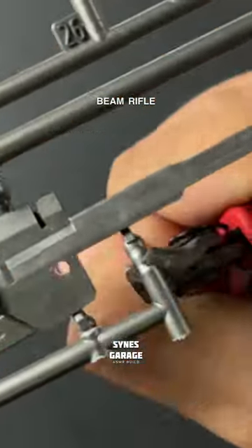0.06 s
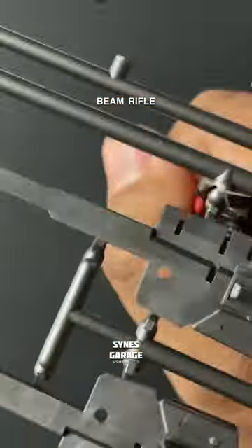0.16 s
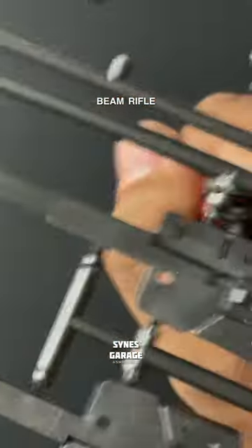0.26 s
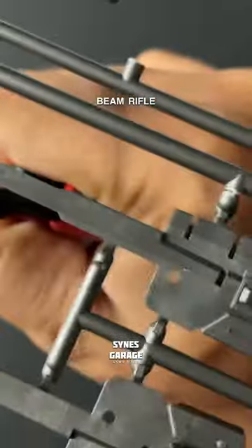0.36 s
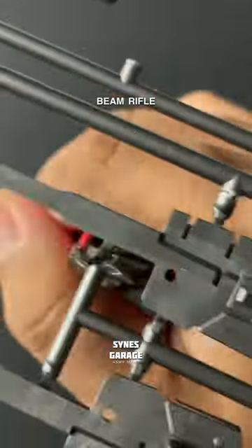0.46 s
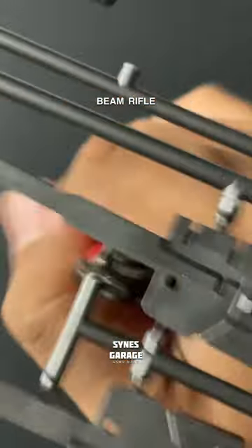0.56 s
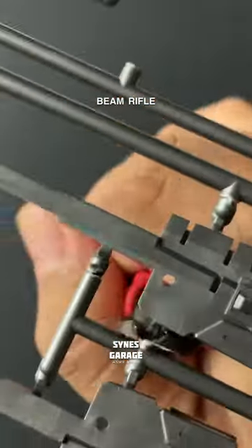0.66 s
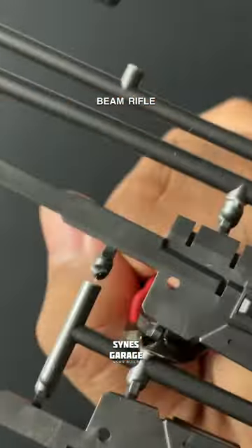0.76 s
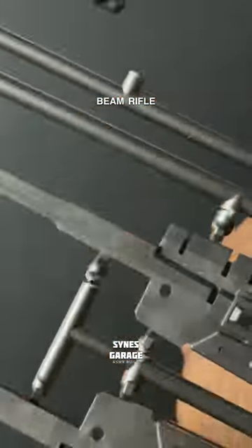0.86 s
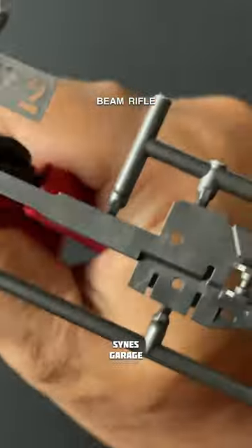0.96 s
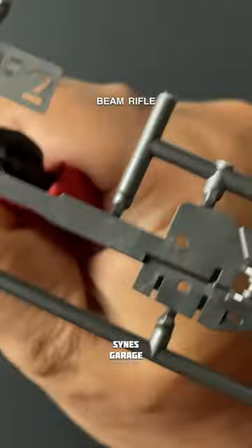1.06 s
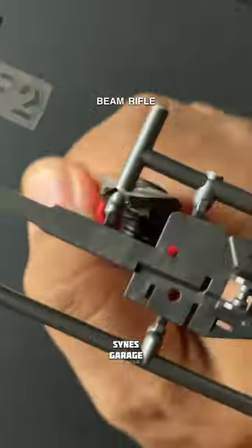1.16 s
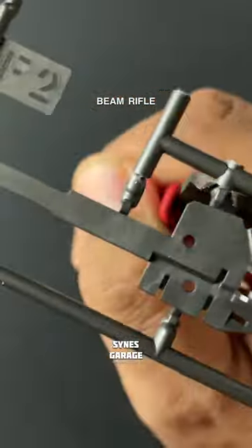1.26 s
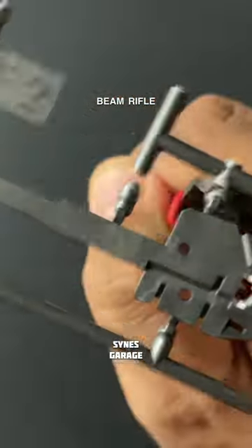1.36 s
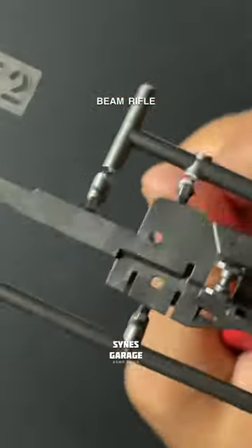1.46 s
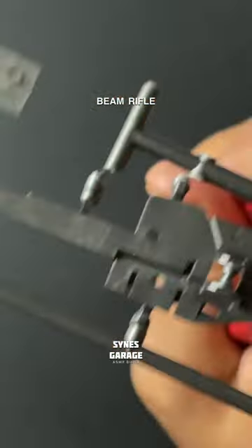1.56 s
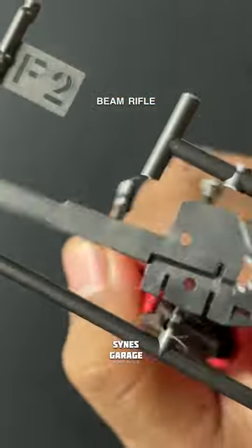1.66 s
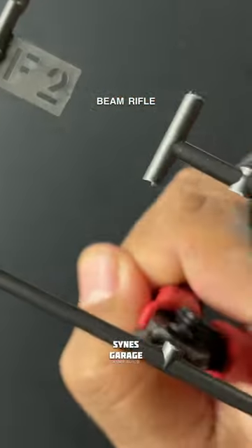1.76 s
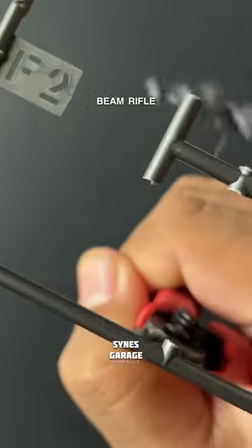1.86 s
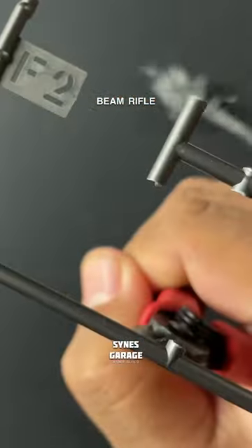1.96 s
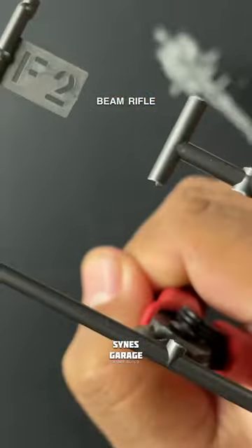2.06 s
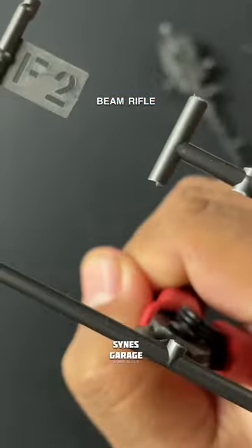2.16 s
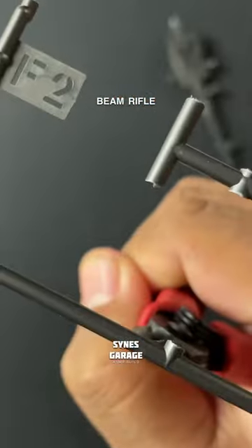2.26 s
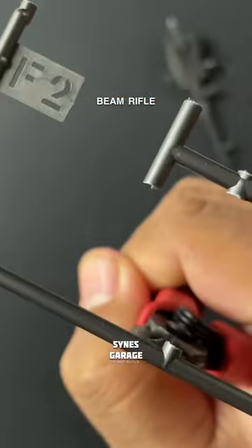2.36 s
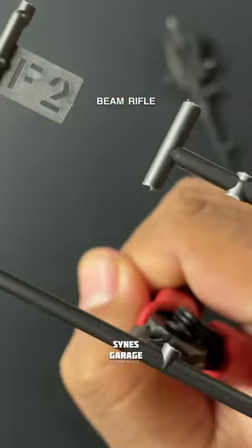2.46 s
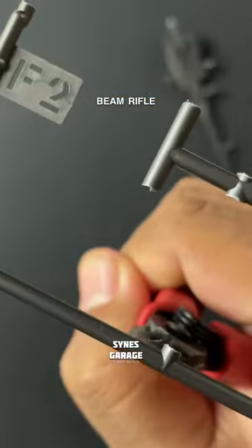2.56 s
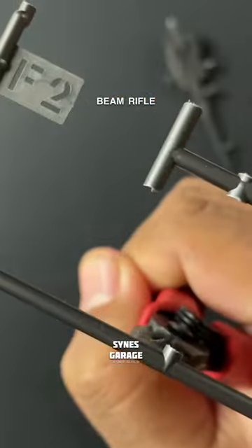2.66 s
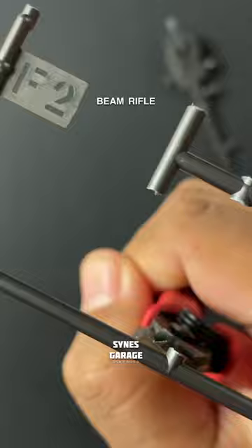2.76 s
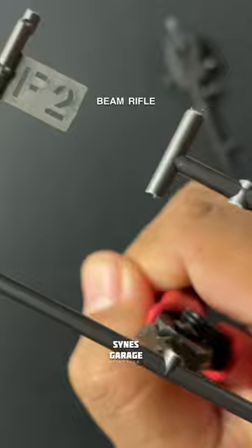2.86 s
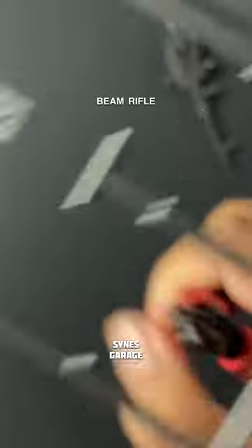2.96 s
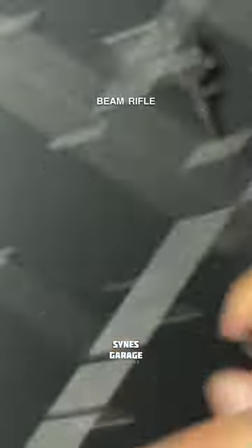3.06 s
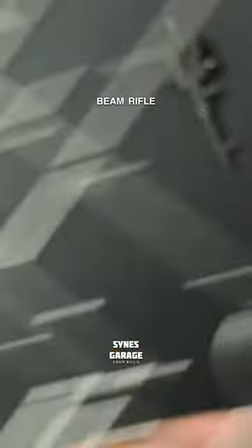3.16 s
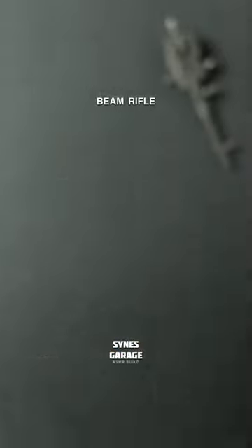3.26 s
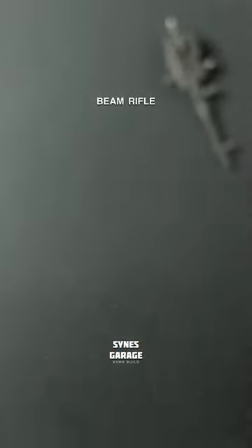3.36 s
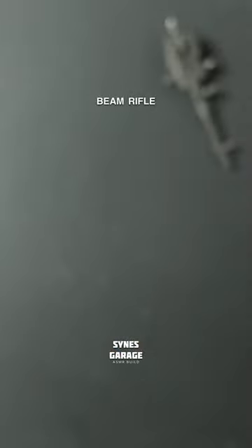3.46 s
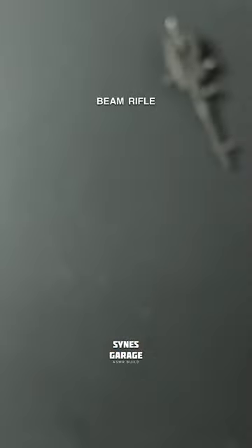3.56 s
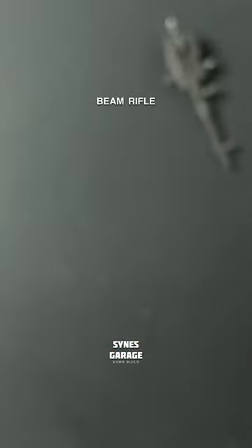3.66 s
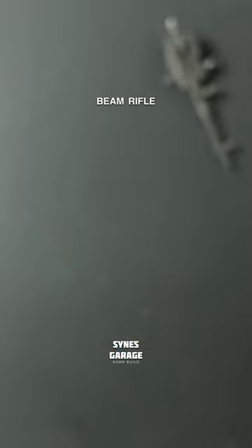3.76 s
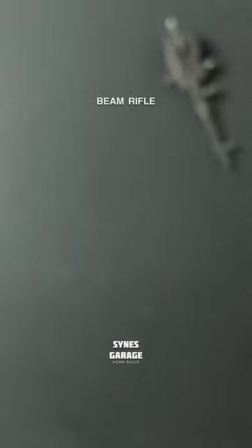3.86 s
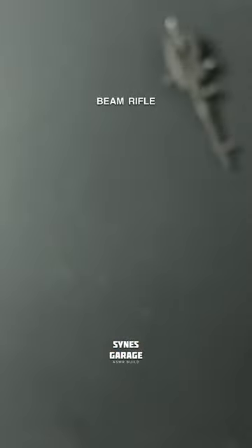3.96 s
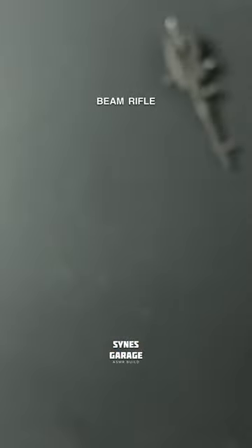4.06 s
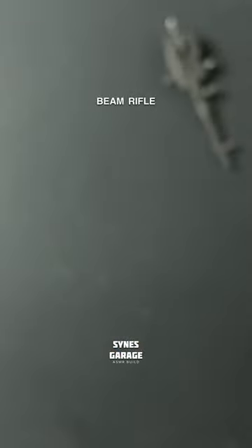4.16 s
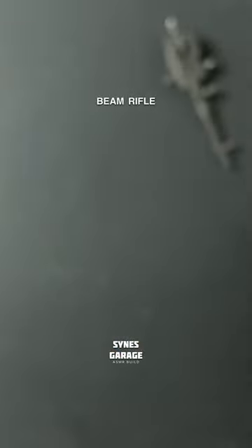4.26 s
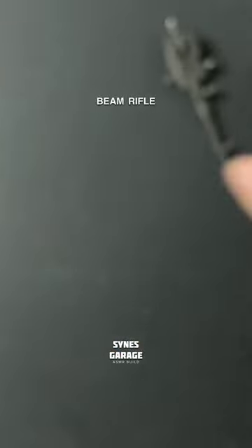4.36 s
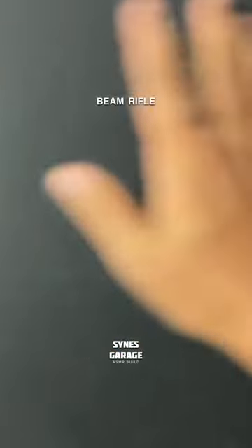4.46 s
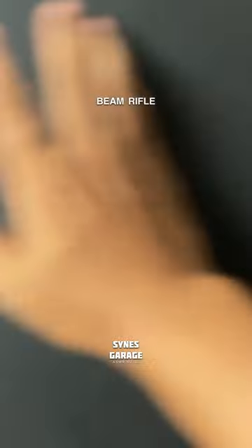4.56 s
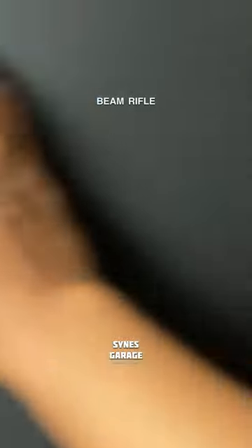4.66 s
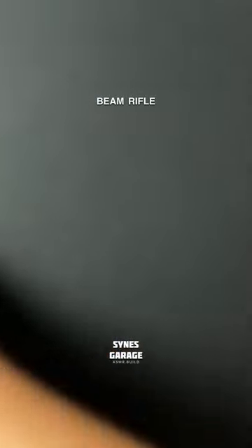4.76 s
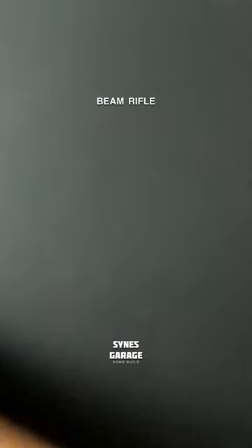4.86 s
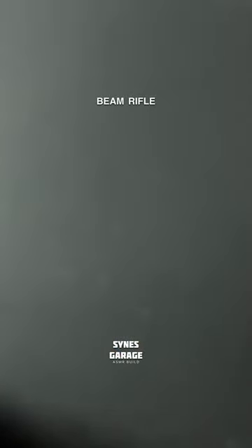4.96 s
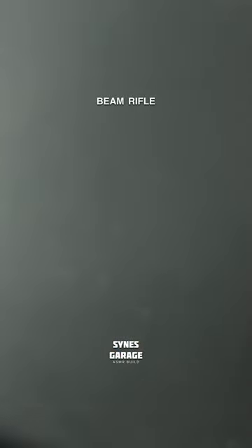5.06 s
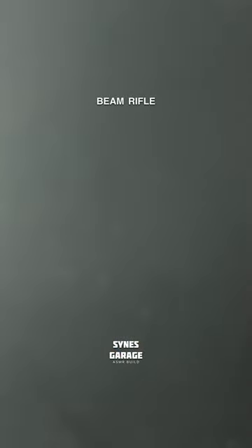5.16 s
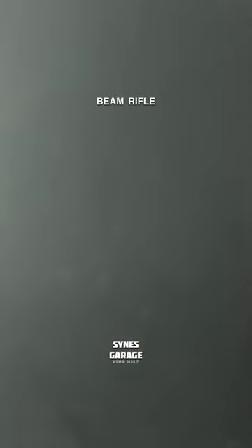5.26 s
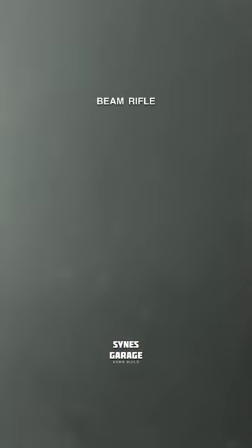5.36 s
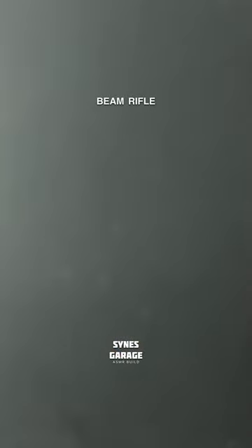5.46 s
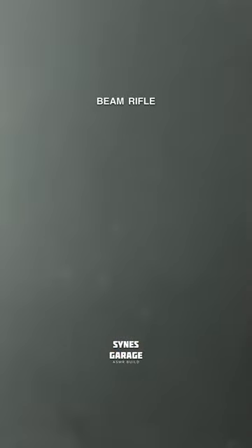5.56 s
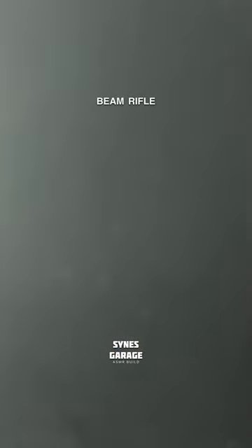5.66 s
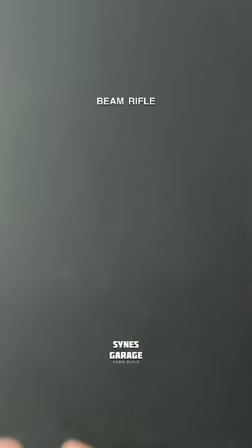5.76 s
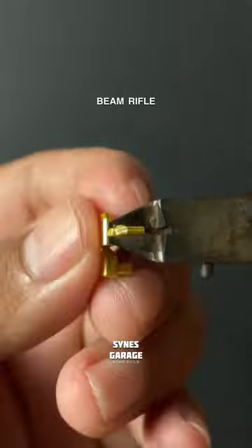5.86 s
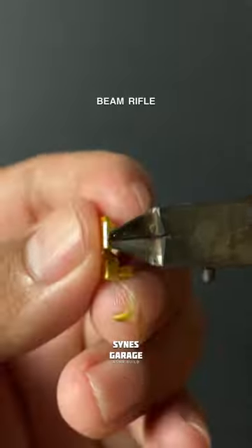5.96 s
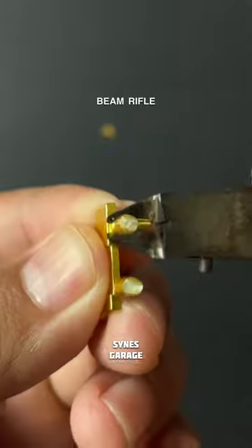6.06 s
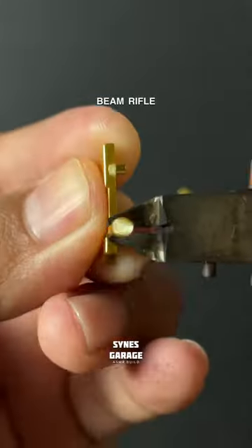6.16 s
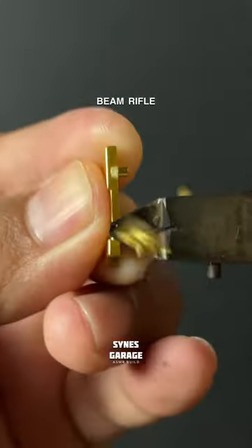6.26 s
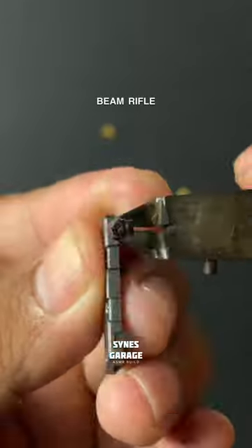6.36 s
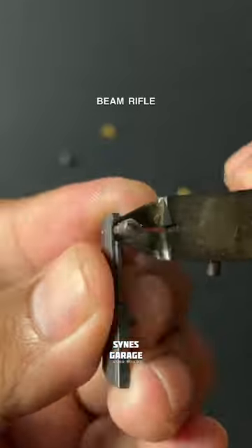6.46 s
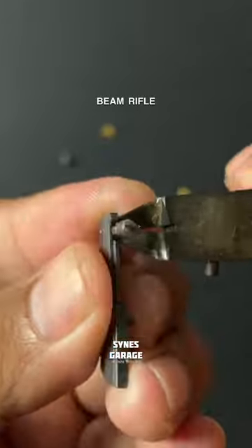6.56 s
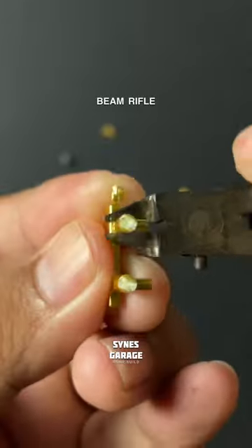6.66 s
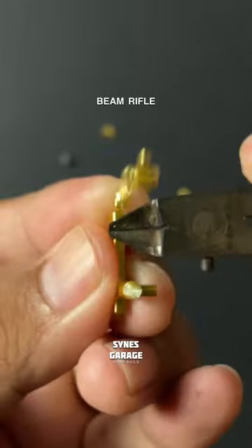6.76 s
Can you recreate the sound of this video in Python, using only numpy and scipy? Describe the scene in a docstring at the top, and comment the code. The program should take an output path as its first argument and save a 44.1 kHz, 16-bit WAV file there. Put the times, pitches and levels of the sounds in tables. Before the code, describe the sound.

Hobby nippers snip a plastic frame in quick abrupt cuts, a part bounces, the frame is set down, a palm sweeps, nubs are trimmed.

```python
"""A fast run of snips, the first already ringing: hobby nippers on a plastic runner, close to a pair of mic ports.
Each snip is a crack that spreads through the plastic as a falling chirp, and a ring that a jump cut ends.
The nippers spring open, a cut part clinks and bounces on the table, and the runner is put down with dull knocks.
A hand wipes over the top, heard as filtered noise in strokes; then six small nubs are trimmed in close-up.
Under it all lie a low rumble and faint air, both shaped noise, at one level for each of three scenes."""
import sys
import numpy as np
from scipy import signal
from scipy.fft import rfft, irfft, next_fast_len
from scipy.io import wavfile
from scipy.ndimage import uniform_filter1d, map_coordinates

SR = 44100
rng = np.random.default_rng(int(sys.argv[2]) if len(sys.argv) > 2 else 0)


def transcribe(u):
    """Save the signal u as a 16-bit wav file named by the first command-line argument.

    u: samples, shape (n,) or (channels, n), limited to [-1, 1]; the rate is SR.
    q: integer samples, one column per channel.
    """
    v = np.clip(np.atleast_2d(u).T, -1, 1)
    q = np.round(v * 32767).astype(np.int16)
    wavfile.write(sys.argv[1], SR, q)


N = 299880

# Room noise in the three scenes: fast cuts, table, close-up. Each row: start in seconds, rumble in dB, air in dB.
ROOM = [(0, -61, -68.5), (1.75, -49, -62), (5.865, -62, -69.5)]
# Colour of the low rumble and of the faint air. Each row: frequency in Hz, relative level in dB.
RUMBLE = [(20, -39), (42, -11.5), (60, -4.5), (68, 2.5), (80, -10.5), (110, -9.5), (165, -20.5),
          (800, -66.5)]
AIR = [(60, -14.5), (200, 6.5), (600, -2), (2000, -7.5), (5000, -14.5), (9000, -31)]

# Things sliding over the table. Each row: start in seconds, length in seconds, rub in dB,
# hiss over rub in dB before its mid-stroke swell, hiss roll-off in Hz.
STROKES = [(2.244, 0.39, -61, -23.5, 5020), (2.903, 0.42, -70, -12, 14000), (3.475, 0.054, -41, 1, 8050),
           (4.333, 0.24, -61, 2.5, 11000), (4.509, 1.072, -44, -5.5, 16600), (5.607, 0.36, -57, -21, 7940)]
# Colour of the friction on the matt top. Each row: frequency in Hz, relative level in dB.
RUB = [(200, 5), (1000, 2.5), (2000, -0.5), (5000, -13), (7000, -14.5), (12500, -11), (16000, -21)]
# Resonances of the table top under the hand. Each row: frequency in Hz, lift in dB before any scaling.
TOP_MODES = [(495, 11.5), (737, 10), (1008, 8)]

# Light taps on the table: first the cut part bouncing, then under the hand. Each row: time in seconds,
# clatter in dB, hardness as crack over clatter in dB, bright tick in dB.
DROPS = [(1.959, -32, -19, -38), (1.968, -29.5, -8.5, -25), (1.9698, -54, 6, -20), (2.1413, -27, 1.5, -42),
         (4.505, -42.5, -1, -53), (5.199, -33.5, -1, -44), (5.3159, -36, -4.5, -33.5)]
# Colour of the clatter, and of the crack of a hard edge. Each row: frequency in Hz, relative level in dB.
DROP = [(50, -3), (120, 7.5), (300, -9.5), (600, -5), (1000, -8.5), (3700, -12), (6500, -23.5),
        (10000, -13.5), (16000, -32)]
TAP_CRACK = [(100, -21), (600, -11), (1500, -6.5), (3300, 2), (5500, -7), (9000, -11), (16000, -20)]
# The runner is put down and settles. Each row: time in seconds, level in dB, treble tilt in dB per octave.
KNOCKS = [(3.8422, -16, 1), (4.048, -23, -2), (4.058, -20, -1), (4.073, -27, -3), (4.104, -25, -3.5)]
# Colour of a runner knock. Each row: frequency in Hz, relative level in dB.
KNOCK = [(40, -22), (115, 3.5), (165, -7), (300, 0.5), (750, -3), (1300, -4), (2400, -16), (4000, -24),
         (11000, -46)]
# How long the table rings. Each row: frequency in Hz, time to fall 60 dB in seconds.
TABLE_T60 = [(100, 0.36), (300, 0.42), (1000, 0.35), (2500, 0.32), (10000, 0.096)]

# The nippers spring open after the last runner snip. Each row: time in seconds, level in dB.
SPRING_PINGS = [(1.7122, -14.5)]
# Modes of the spring. Each row: frequency in Hz, relative level in dB, time to fall 60 dB in seconds.
SPRING_MODES = [(8720, 2.5, 0.022), (15500, -7, .04)]
# The cut part lands on its edge and rings. Each row: time in seconds, level in dB.
CLINKS = [(1.9695, -20.5)]
# Modes of the cut part. Each row: frequency in Hz, relative level in dB, time to fall 60 dB in seconds.
CLINK_MODES = [(5390, -3, 0.07), (6900, 6, 0.057), (10890, 5.5, 0.029), (12670, -7, .088)]

# Stray ticks of jaws and plastic chips. Each row: time in seconds, level in dB.
TICKS = [(0.0573, -47.5), (0.088, -29), (0.522, -55), (1.673, -47), (1.7106, -29), (2.1465, -27),
         (2.2553, -40.5), (2.297, -37.5), (2.92, -61), (3.059, -61.5), (4.968, -46), (4.991, -35.5),
         (5.01, -36), (5.284, -41), (5.543, -37.5)]
# Colour of a tick. Each row: frequency in Hz, relative level in dB.
TICK = [(300, -6.5), (1000, -10.5), (2500, -7.5), (4000, -12), (6500, -4), (11500, -1), (15500, -6)]

# Nubs trimmed off a part held in the fingers. Each row: start in seconds, time to the jump cut in seconds,
# snap in dB, thump, crunch and treble tone in dB, ring over snap in dB, closing jaws over snap in dB.
TRIMS = [(5.9245, 0.097, -11, -1.5, -3, 2.5, -23, -29), (6.1077, 0.07, -12.5, 0.5, -5.5, 3.5, -18.5, -18),
         (6.2431, .094, -13, -3.5, -5, 3, -14.5, -5), (6.425, 0.076, -24, -7.5, -2.5, 1.5, -17.5, -18),
         (6.5812, .081, -14.5, -6.5, -11.5, 4.5, -18, -8.5), (6.7273, .3, -12, -10, -13.5, -0.5, -20, -17)]
# Snap and ring colour of the held part. Each row: frequency in Hz, relative level in dB.
PART_SNAP = [(100, -29.5), (280, -2), (550, -18), (1100, -25.5), (2200, -8), (2900, -12.5), (4200, -10.5),
             (5600, -6.5), (7500, -7.5), (10500, -1), (12500, -19), (15500, 3)]
PART_RING = [(280, -2), (600, -18), (1500, -20.5), (2100, -2.5), (3000, -10), (4500, -11), (5600, -5),
             (6800, -13), (8500, -15.5), (10500, -6), (12500, -19.5), (15500, -2.5)]
# Resonances of the nippers. Each row: frequency in Hz, lift in dB before any scaling.
NIPPER_MODES = [(2060, 9.2), (2390, 9.2), (5420, 6.4), (5850, 3), (10700, 6.1)]

# Snips on the runner. Each row: start in seconds, time to the jump cut in seconds,
# snap in dB, thump, crunch and treble tone in dB, ring over snap in dB, closing jaws over snap in dB.
SNIPS = [(-0.05, 0.073, -12, -4, 2, -7, -13.5, -17), (.0934, 0.091, -11, -2, 3.5, 0.5, -12, -14.5),
         (.2619, .078, -9.5, 1.5, 4.5, 4, -12.5, -19.5), (.4102, .089, -14.5, 1, -1.5, -7.5, -13.5, -58),
         (.5763, 0.086, -15, 6, -2, -4, -16.5, -34), (.7214, .1, -11.5, -2, -6, -9, -16.5, -22.5),
         (.8974, 0.091, -8, -2.5, -1, -10, -12.5, -20), (1.0547, .086, -19.5, -1, 0, -1.5, -11, -6.5),
         (1.2218, .077, -15, -1.5, 1.5, -1, -12.5, -17.5), (1.357, 0.1, -10.5, -7.5, -1.5, 0, -13, -13),
         (1.5316, 0.093, -20, -2, 0, -1, -12, -13.5), (1.6935, 0.53, -13, -1.5, -5, 1, -15, -16.5)]
# Snap and ring colour of the runner. Each row: frequency in Hz, relative level in dB.
RUNNER_SNAP = [(50, -29.5), (130, -14), (250, -6), (420, -1), (780, -11), (1400, -4.5), (2400, -11.5),
               (3200, -13.5), (4000, -16.5), (7000, -14.5), (9000, -12), (12500, -19.5), (15500, -16)]
RUNNER_RING = [(40, -20.5), (120, -7), (700, -7.5), (1300, -8.5), (1800, -3.5), (2400, -6.5), (3100, -15),
               (4200, -17), (6500, -18.5), (10500, -19.5), (13000, -27.5), (16000, -27)]
# Damped resonances of blade and gate, then lattice modes of the runner. Each row: frequency in Hz, lift in dB.
SNAP_MODES = [(1420, 5), (2430, 7.5), (3950, 9), (8750, 3)]
RUNNER_MODES = [(389.8, 9.1), (437, 6.1), (2700, 4.8), (2200, 6.9), (2340, 4.6)]
# How long snips, ticks and the answer to a ping ring. Each row: frequency in Hz, time to fall 60 dB in seconds.
RING_T60 = [(120, 0.24), (400, 0.33), (2300, 0.24), (5500, 0.21), (12000, 0.17)]

# Width of the sound field at the two ports. Each row: frequency in Hz, side level in dB.
SPREAD = [(100, -15), (300, -8), (600, -1.5), (2500, -3.5), (5000, -7), (10000, -29.5)]
# Level difference of the ports. Each row: frequency in Hz, left over right in dB.
BALANCE = [(350, -.6), (700, 0), (1400, 2.6), (2800, 5.8), (5500, 2.5), (9000, 0)]
# Phase difference of the ports. Each row: frequency in Hz, phase lead of the left port in radians.
TWIST = [(1000, 0), (3000, .4), (5300, .1), (6600, -.9), (8200, -3.1), (10500, -5.6), (12300, -6.5),
         (15000, -9.4)]
TOP_HZ = 16450  # the band ends here

LEAD_IN_S = 0.012  # length of the noise that swells up before each snap
JAWS_MEET_S = 0.0035  # the blades meet this long after the snap
JOLT_S = 0.022  # each snip jolts the hands: time to the peak of the low thud
TAP_BASS_DB, BASS_PER_HARDNESS = -9, 0.92  # softer taps carry more bass: base level, dB lost per dB of hardness
STROKE_ATTACK_S, STROKE_RELEASE_DB_PER_S = 0.056, 219.5
MID_STROKE_HISS_DB = 6  # the hiss swells where the stroke is fastest
LIFT_DB, LIFT_S = 4, 0.033  # thud as pressure comes off the table: level against the rub, time to its peak
FIRM_STROKE_DB, SKIP_PER_DB = -62.5, 0.33  # a lighter stroke skips: dB of flutter for each dB under a firm one
SPECKS_PER_S, SPECK_DB = 65, -11  # dust caught under a stroke: rate, level against the raw friction noise


def amp(db):
    """Amplitude factor of a level in dB."""
    return 10 ** (np.asarray(db) / 20)


def unit(x):
    """x scaled to rms 1."""
    return x / np.sqrt(np.mean(x ** 2) + 1e-20)


def levelled(x, span):
    """x scaled to rms 1 over its first span seconds."""
    return x / np.sqrt(np.mean(x[..., :int(span * SR)] ** 2) + 1e-20)


def along(points, hz):
    """Interpolate (Hz, value) points on a log frequency axis."""
    f, v = np.transpose(points)
    return np.interp(np.log(hz + 1), np.log(f + 1), v)


def wobble(rate, size=N):
    """A smooth random curve, rate knots a second."""
    knots = rng.standard_normal(int(size * rate / SR) + 4)
    return map_coordinates(knots, [np.arange(size) * rate / SR])


def filtered(x, response):
    """x filtered by a complex response of frequency."""
    n = x.shape[-1]
    padded = next_fast_len(n + SR // 4)
    spectrum = rfft(x, padded) * response(np.fft.rfftfreq(padded, 1 / SR))
    return irfft(spectrum, padded)[..., :n]


def coloured(x, level):
    """Causal (minimum-phase) filter whose gain in dB is level(Hz)."""
    def response(hz):
        # folding the cepstrum puts all its energy after time zero
        cepstrum = irfft(np.log(amp(level(hz))))
        half = len(cepstrum) // 2
        cepstrum[1:half] *= 2
        cepstrum[half + 1:] = 0
        return np.exp(rfft(cepstrum))
    return filtered(x, response)


def peaks(modes, hz, q):
    """dB lift of resonances, each down to half its lift at 10 Hz + f / q off centre."""
    return sum(db / (1 + ((hz - f) / (10 + f / q)) ** 2) for f, db in modes)


def ripple(spacing, depth_db):
    """Random peaks and dips in dB over frequency: each point of contact favours other modes."""
    knots = rng.standard_normal(2048)
    return lambda hz: depth_db * map_coordinates(knots, [hz / spacing], order=1, mode="wrap")


def add(track, s, x):
    """Mix x into the track from time s, dropping what falls outside."""
    start = round(s * SR)
    x = x[..., max(-start, 0):]
    part = track[:, max(start, 0):]
    part[:, :x.shape[-1]] += x[..., :part.shape[1]]


def diffuse(n):
    """Stereo noise, partly alike at the two ports."""
    mid, side = rng.standard_normal((2, n))
    side = filtered(side, lambda hz: amp(along(SPREAD, hz)))
    return np.array([mid + side, mid - side])


def dying(t60s):
    """Half a second of dense ringing in which each frequency dies at its own speed."""
    hz, t, z = signal.stft(diffuse(SR // 2), SR, nperseg=256)
    decay = amp(-60 * t / along(t60s, hz)[:, None])
    return signal.istft(z * decay, SR)[1][:, :SR // 2]


def thud(peak_s):
    """A soft push that swells and dies in the low resonances of table and room."""
    t = np.arange(SR // 2) / SR
    rumble = unit(filtered(diffuse(len(t)), lambda hz: amp(along(RUMBLE, hz))))
    return rumble * t / peak_s * np.exp(1 - t / peak_s)


def crack(level, life, grit, bend, push_hz=1500):
    """One low push and a swelling spray of micro-fractures; bending waves bring the lows later.

    life times the spray in seconds, grit weighs its longer tail, bend is the delay in seconds at 1 kHz."""
    t = np.arange(SR // 16) / SR
    swell = t / life * np.exp(-3 * t / life) + grit * np.exp(-t / (3 * life))
    spray = diffuse(len(t)) * swell
    spray /= np.linalg.norm(spray[0])
    low = lambda hz: 1 / np.sqrt(1 + (hz / push_hz) ** 4)
    push = filtered(signal.unit_impulse(len(t), 8), low)
    force = push + filtered(spray, lambda hz: np.sqrt(1 - low(hz) ** 2))
    # delay falls as 1 / sqrt(frequency): the chirp
    chirp = filtered(force, lambda hz: np.exp(-4j * np.pi * bend * np.sqrt(1000 * hz)))
    return levelled(coloured(chirp, level), 0.01)


def tick(uneven_db=4):
    """A light contact: a small crack with a faint ring."""
    contact = ripple(170, uneven_db)
    colour = lambda hz: along(TICK, hz) + contact(hz)
    out = amp(-12) * levelled(coloured(dying(RING_T60), colour), 0.015)
    add(out, 0, crack(colour, life=0.002, grit=0.086, bend=0.0004))
    return out


def room():
    """A low rumble at one level within each scene, and faint air that flutters around its own."""
    starts, *levels = np.transpose(ROOM)
    which = np.searchsorted(starts[1:], np.arange(N) / SR)
    rumble, air = [uniform_filter1d(amp(db)[which], size=256) for db in levels]
    noise = lambda spectrum: unit(filtered(diffuse(N), lambda hz: amp(along(spectrum, hz))))
    return rumble * noise(RUMBLE) + air * noise(AIR) * amp(1.9 * wobble(28))


def specks():
    """Sparse catches of uneven size, each a tiny scrape."""
    chance, size = rng.random(N), rng.standard_normal(N)
    t = np.arange(SR // 20) / SR
    hits = (chance < SPECKS_PER_S / SR) * abs(size)
    catches = signal.fftconvolve(hits, np.exp(-t / 0.0026))[:N]
    return unit(catches * diffuse(N))


def patchy(x, depth_db):
    """Colour that drifts at random from moment to moment."""
    z = signal.stft(x, nperseg=512)[2]
    field = rng.standard_normal(z.shape[1:])
    field = uniform_filter1d(field, size=4, axis=0)  # over frequency
    field = uniform_filter1d(field, size=12, axis=1)  # over time
    return signal.istft(z * amp(depth_db * unit(field)))[1][:, :N]


def wiping():
    """Dragging over the matt top: a soft, grainy rub and a finer hiss, each stroke ending in a soft thud."""
    out, t = np.zeros((2, N)), np.arange(N) / SR
    grain = patchy(diffuse(N) + amp(SPECK_DB) * specks(), depth_db=1.5)
    friction = filtered(grain, lambda hz: amp(along(RUB, hz) + peaks(TOP_MODES, hz, q=1100)))
    friction *= amp(1.3 * wobble(160) + 1.3 * wobble(24))
    below = lambda hz: 1 / (1 + (hz / 3500) ** 4)
    rub = unit(filtered(friction, lambda hz: hz / (hz + 90) * below(hz)))
    rub = rub * amp(0.43 * wobble(11))
    for s, length, db, hiss_db, top_hz in STROKES:
        hiss = unit(filtered(friction, lambda hz: (1 - below(hz)) / (1 + (hz / top_hz) ** 4)))
        attack = np.clip((t - s) / STROKE_ATTACK_S, 0, 1)
        envelope = attack * amp(db - STROKE_RELEASE_DB_PER_S * np.maximum(t - s - length, 0))
        envelope *= amp(SKIP_PER_DB * max(FIRM_STROKE_DB - db, 0) * wobble(23))
        speed = np.sin(np.pi * np.clip((t - s) / length, 0, 1)) ** 2
        out += envelope * (rub + amp(hiss_db + MID_STROKE_HISS_DB * speed) * hiss)
        add(out, s + length - LIFT_S / 2, amp(db + LIFT_DB) * thud(LIFT_S))
    return out * (t < ROOM[-1][0])  # all stop at the cut to the close-up


def taps(uneven_db=3.0):
    """Light things clatter on the top and ring it, with a crack from the edge and a bright tick."""
    out = np.zeros((2, N))
    for s, db, hard_db, tick_db in DROPS:
        contact = ripple(90, uneven_db)
        bass = [(150, TAP_BASS_DB - BASS_PER_HARDNESS * hard_db), (500, 0.0073)]
        top = lambda hz: 0.51 * peaks(TOP_MODES, hz, q=140)
        colour = lambda hz: along(DROP, hz) + along(bass, hz) + top(hz) + contact(hz)
        edge = lambda hz: along(TAP_CRACK, hz)
        add(out, s, amp(db) * levelled(coloured(dying(TABLE_T60), colour), 0.009))
        add(out, s, amp(db + hard_db) * crack(edge, life=0.0006, grit=0.02, bend=0.0001, push_hz=6000))
        add(out, s, amp(tick_db) * tick())
    return out


def runner_knocks():
    """The large runner lands with dull knocks: a crack and the ringing table under one tilted colour."""
    out = np.zeros((2, N))
    for s, db, tilt_db in KNOCKS:
        colour = lambda hz: along(KNOCK, hz) + tilt_db * np.log2(np.clip(hz, 100, 4000) / 1000)
        add(out, s, amp(db) * levelled(coloured(dying(TABLE_T60), colour), 0.012))
        add(out, s, amp(db - 4.5) * crack(colour, life=0.00204, grit=0.075, bend=0.001253))
    return out


def pings(rows, modes, room_db):
    """A small hard object struck once: a few short high modes, answered by the room."""
    out, t = np.zeros((2, N)), np.arange(SR // 4) / SR
    for s, db in rows:
        ring = np.zeros(len(t))
        for hz, level, t60 in modes:
            phase = 2 * np.pi * hz * t + 0.4 * wobble(400, size=len(t))
            ring += amp(level - 60 * t / t60) * np.sin(phase)
        echo = signal.fftconvolve(ring[None], dying(RING_T60), axes=1)
        echo *= amp(room_db) * np.linalg.norm(ring) / np.linalg.norm(echo[0])
        add(out, s, amp(db) * (ring + echo[:, :len(t)]))
    return out


def ticks():
    """Jaws and loose chips touch here and there."""
    out = np.zeros((2, N))
    for s, db in TICKS:
        add(out, s, amp(db) * tick())
    return out


def swell_in(level):
    """A short noise that swells up to the hit."""
    t = np.arange(int(LEAD_IN_S * SR)) / SR
    return unit(coloured(diffuse(len(t)), level)) * amp(-1400 * (LEAD_IN_S - t))


def cuts(rows, snap, ring, life, grit, bend, lead_in_db, jolt_db, uneven_db, chatter_db):
    """Each snip swells in briefly, snaps, closes the jaws, then rings and chatters until its jump cut."""
    out, t = np.zeros((2, N)), np.arange(SR // 2) / SR
    for s, held, db, thump_db, crunch_db, treble_db, ring_db, jaws_db in rows:
        points = [(500, thump_db), (1300, 0.0056), (2300, crunch_db), (4500, 0.00069), (8500, treble_db)]
        contact = ripple(140, uneven_db)
        tone = lambda hz: along(points, hz) + contact(hz)
        colour = lambda hz: snap(hz) + tone(hz)
        add(out, s - LEAD_IN_S, amp(db + lead_in_db) * swell_in(colour))
        add(out, s, amp(db) * crack(colour, life, grit, bend))
        jaws = crack(colour, life=0.0012, grit=0.03, bend=0.0004)
        add(out, s + JAWS_MEET_S, amp(db + jaws_db) * jaws)
        tail = coloured(dying(RING_T60), lambda hz: ring(hz) + tone(hz))
        chatter = amp(chatter_db * np.exp(-t / 0.11) * wobble(330, size=len(t)))
        tail = levelled(tail * chatter, 0.026)
        after = amp(db + ring_db) * tail + amp(jolt_db) * thud(JOLT_S)
        gate = (1 - np.exp(-t / 0.0017)) * np.clip((held - t) / 0.0031, 0, 1)
        add(out, s, after * gate)
    return out


def nub_trims():
    """A small part damped by the fingers gives a short, bright click; the nippers ring at their own modes."""
    snap = lambda hz: along(PART_SNAP, hz) + 1.4 * peaks(NIPPER_MODES, hz, q=44)
    ring = lambda hz: along(PART_RING, hz) + peaks(NIPPER_MODES, hz, q=29)
    return cuts(TRIMS, snap, ring, life=0.0019, grit=0.033, bend=0.00036,
                lead_in_db=-26, jolt_db=-54, uneven_db=0.0, chatter_db=2.5)


def runner_snips():
    """The whole frame flexes and rings at its lattice modes; the first snip is already ringing at the start."""
    snap = lambda hz: along(RUNNER_SNAP, hz) + peaks(SNAP_MODES, hz, q=26)
    ring = lambda hz: along(RUNNER_RING, hz) + peaks(RUNNER_MODES, hz, q=36)
    return cuts(SNIPS, snap, ring, life=0.0018, grit=0.05, bend=0.0015,
                lead_in_db=-26, jolt_db=-47.5, uneven_db=2.5, chatter_db=2.5)


def scene():
    """Everything in front of the microphones, from the room noise to the snips."""
    on_table = wiping() + taps() + runner_knocks()
    spring = pings(SPRING_PINGS, SPRING_MODES, room_db=-18.5)
    clink = pings(CLINKS, CLINK_MODES, room_db=-15)
    return room() + on_table + spring + clink + ticks() + nub_trims() + runner_snips()


def record(dry):
    """The two ports differ in level and phase; peaks over full scale clip; the band is limited."""
    def ports(hz):
        # half of each difference goes to either port, at constant total power
        tilt = amp(along(BALANCE, hz) / 2) * np.exp(0.5j * along(TWIST, hz))
        pair = np.array([tilt, 1 / tilt])
        return pair / np.sqrt(np.mean(abs(pair) ** 2, axis=0))
    clipped = np.clip(filtered(dry, ports), -1, 1)
    return filtered(clipped, lambda hz: 1 / (1 + (hz / TOP_HZ) ** 70))


dry = scene()
out = record(dry)
transcribe(out)
```